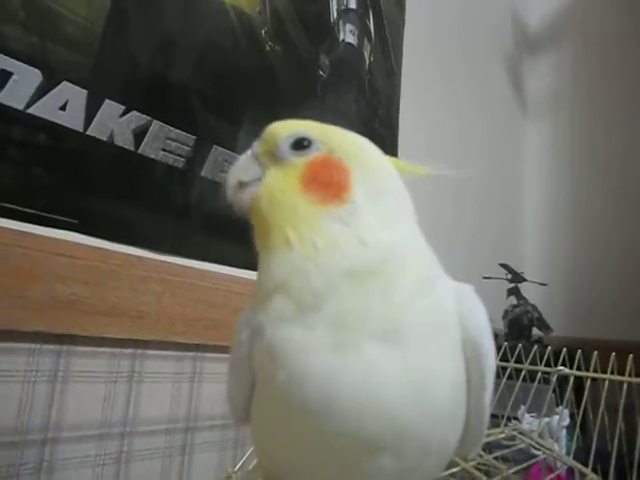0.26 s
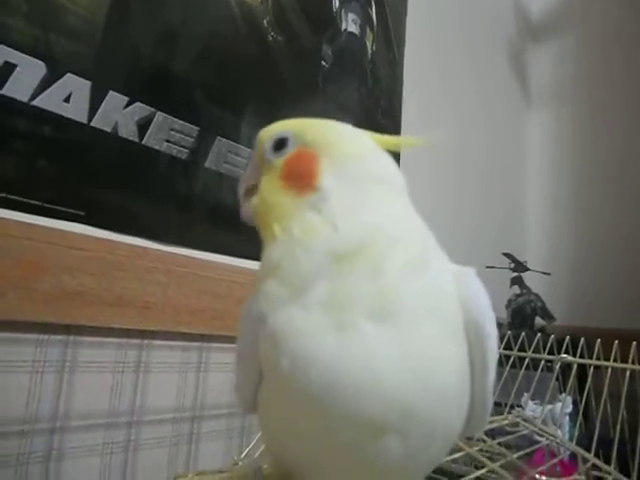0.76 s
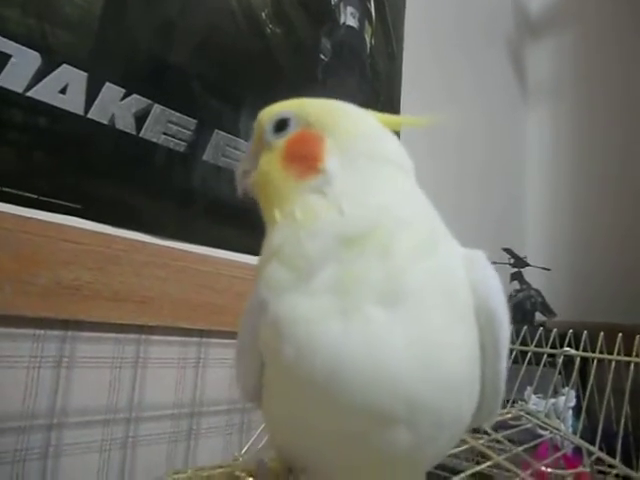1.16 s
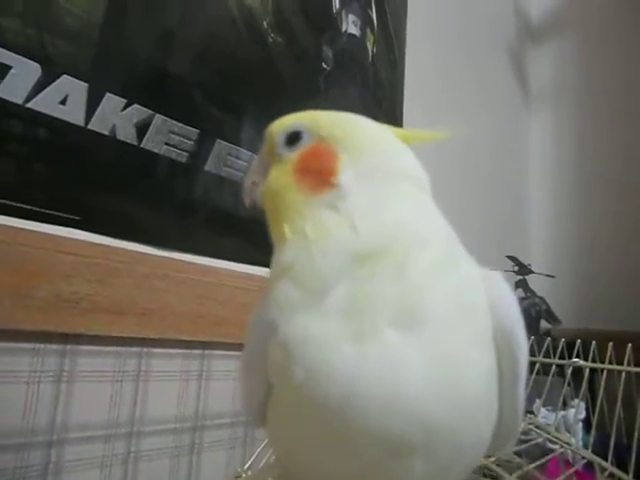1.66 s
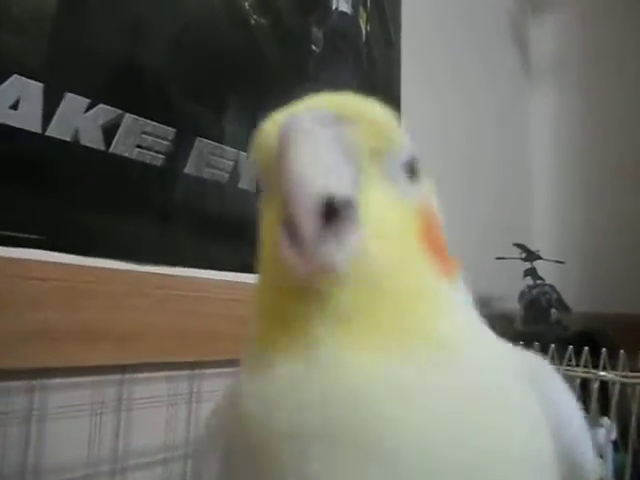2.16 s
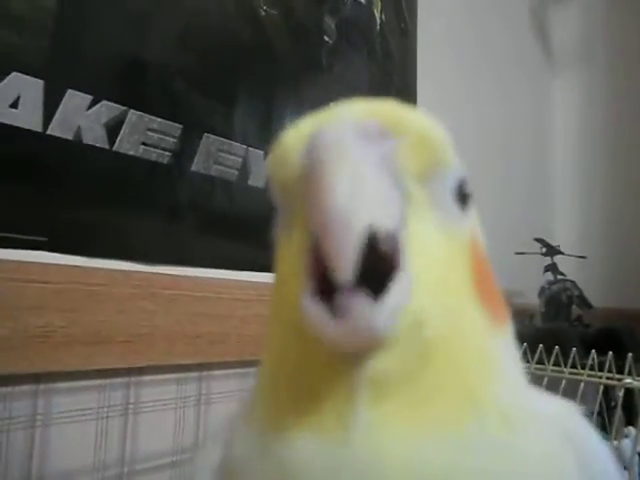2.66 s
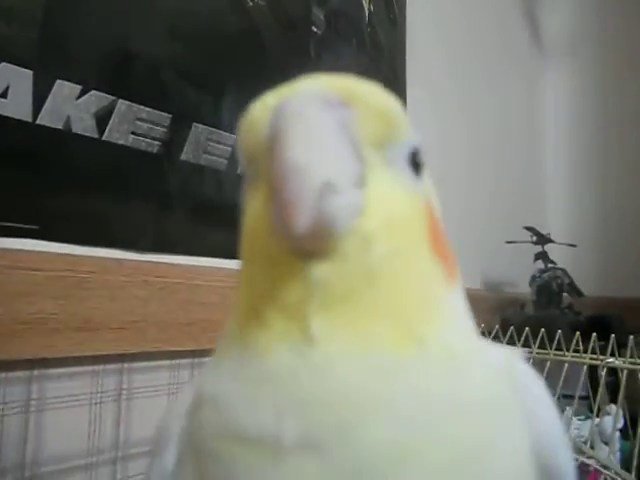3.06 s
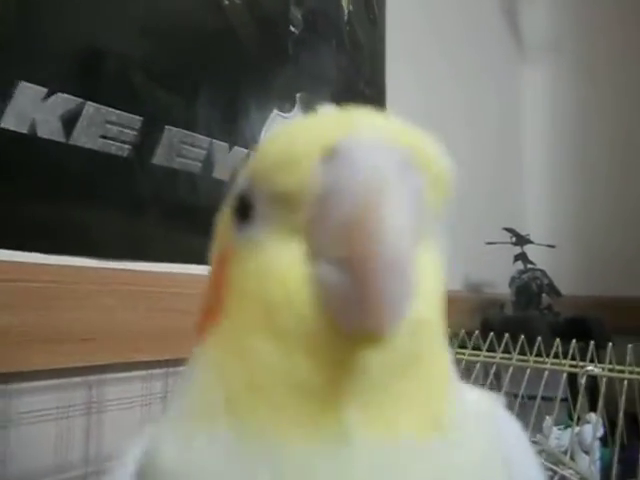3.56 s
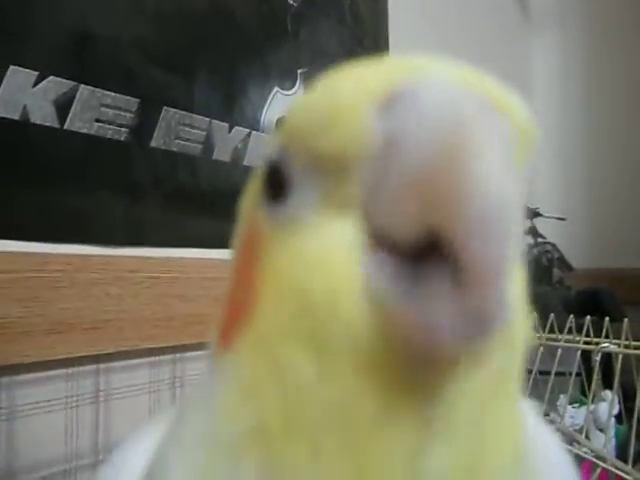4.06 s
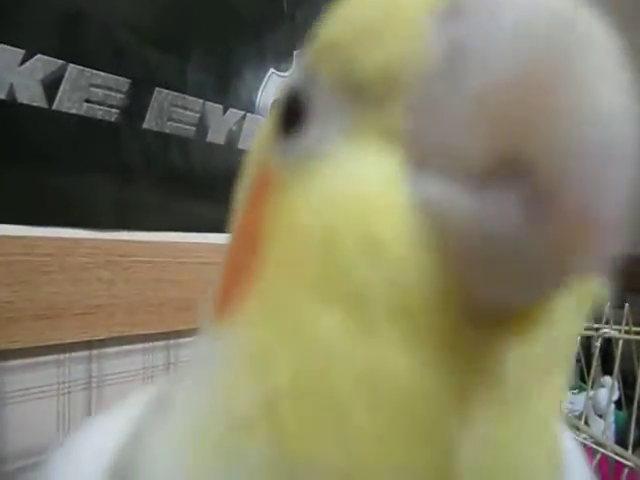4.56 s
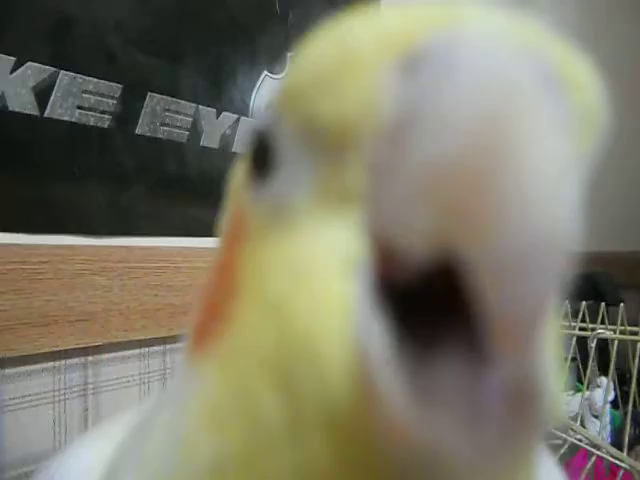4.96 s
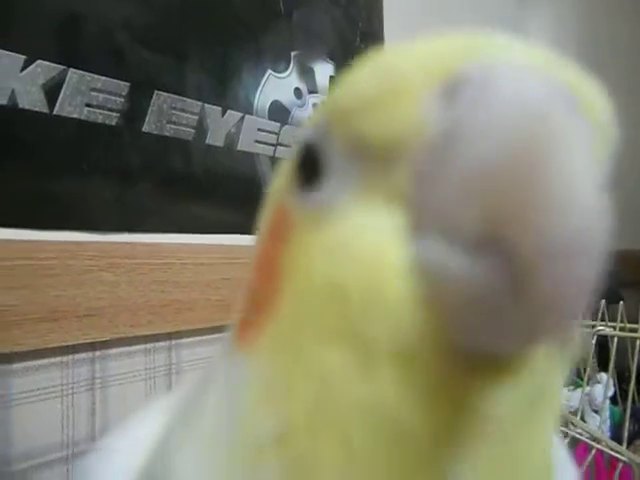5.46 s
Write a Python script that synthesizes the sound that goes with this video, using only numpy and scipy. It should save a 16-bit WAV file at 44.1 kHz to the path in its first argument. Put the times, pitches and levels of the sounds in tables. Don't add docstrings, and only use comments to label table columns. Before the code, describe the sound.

A small parrot calls close to the microphone in a small furnished room with little echo. From 0 to 0.8 s come four short, moderate, raspy croaks, each about a tenth of a second, swelling as the beak opens and closing with a small chirpy catch. Around 0.9 to 1.6 s three harsher, open-beaked rasps follow, then three swelling croaks that grow louder to 2.25 s, with a faint foot thump at 1.9 s. At 2.4 and 2.6 s two loud bursts yelp high and drop into a buzz, the second with a tiny squeak. A pause follows to 3.95 s, with faint beak ticks, a sharp click at 3.83 s, and hum and hiss creeping up. The loudest burst hits at 3.96 s, slightly clipped; more follow at 4.2, 4.4 (weaker) and 4.7 s, interleaved from 4.86 s by four lower, softer, rougher groans ending near 5.65 s.

```python
import sys
import numpy as np
from scipy import signal
from scipy.io import wavfile
from scipy.ndimage import uniform_filter1d

SR = 44100
rng = np.random.default_rng(int(sys.argv[2]) if len(sys.argv) > 2 else 0)


def gain_from_db(level_db):
    decades = np.asarray(level_db, float) / 20
    return 10 ** decades


def to_wav(s):
    ch = np.atleast_2d(s).T
    pcm = np.round(np.clip(ch, -1, 1) * 32767)
    wavfile.write(sys.argv[1], SR, pcm.astype(np.int16))


N = 252252


def evened(x):
    return x / np.sqrt(np.mean(x ** 2) + 1e-20)


def wander(hz):
    return evened(signal.sosfilt(signal.butter(2, hz, fs=SR, output="sos"), rng.standard_normal(N)))


def resonate(x, hz, width):
    turn = np.exp(2j * np.pi * np.cumsum(hz * np.ones(len(x))) / SR)
    r = np.exp(-np.pi * width / SR)
    return 2 * (turn * signal.lfilter([1 - r], [1, -r], x / turn)).real


def pulses(hz, rough):
    jitter = (.012 + 0.28 * rough ** 2) * wander(300) + .011 * wander(70)
    turns = np.cumsum(hz * np.exp(jitter)) / SR
    at = np.flatnonzero(np.diff(np.floor(turns)))
    late = (np.ceil(turns[at]) - turns[at]) / (turns[at + 1] - turns[at])
    flap_db = (0.55 + rough) * 2.9 * np.tanh(0.77 * wander(600))
    slow_db = 3.4 * np.tanh(0.61 * wander(130))
    strength = gain_from_db(flap_db + slow_db) / np.sqrt(hz / SR)
    strength *= np.where(wander(260) > 3.3 - 2.3 * rough, .2, 1)
    train = np.zeros(N + 16)
    for k in range(16):
        u = k - 7 - late
        np.add.at(train, at + k, strength[at] * np.sinc(u) * (1 + np.cos(np.pi * u / 8)) / 2)
    return train[7:N + 7]


def croaks(calls, width_hz, below_db, above_db, second_db):
    # mode_hz, mode_width_hz, level_db
    pipe_modes = [(680, 570, -8.5), (1426, 1416, 2)]
    s, beak_db, beak_hz, *columns = np.transpose(sum(calls, []))
    t = np.arange(N) / SR
    pipe_db, hz, rough = (np.interp(t, s, c) for c in columns)
    beak_hz = np.cbrt(np.interp(t, s, beak_hz ** 3))
    rough = np.clip(rough, 0, 1)
    sounding = np.zeros(N)
    for rows in calls:
        to_edge = np.minimum(t - rows[0][0] + 0.0014, rows[-1][0] + 0.0018 - t)
        sounding += np.clip(to_edge / 0.00062, 0, 1)
    breath = (.12 + .07 * rough) * rng.standard_normal(N)
    drive = sounding * (pulses(hz, rough) + breath)

    open_beak = gain_from_db(np.interp(t, s, beak_db)) * drive
    skirt = resonate(open_beak, beak_hz, width_hz)
    ring = resonate(skirt, beak_hz * 0.901, width_hz)
    ring = resonate(ring, beak_hz * 1.017, width_hz)
    low = ring - gain_from_db(below_db) * skirt
    for above in (1.3, 1.7):
        low = low - resonate(low, beak_hz * above, 1263)
    low = signal.sosfilt(signal.butter(5, (1200, 5000), "band", fs=SR, output="sos"), low)

    high = gain_from_db(second_db) * resonate(open_beak, beak_hz * 1.93, 800) - gain_from_db(above_db) * skirt
    high = high * (beak_hz / 4000) ** 4
    high = signal.sosfilt(signal.butter(4, (5300, 8300), "band", fs=SR, output="sos"), high)

    pipe_drive = gain_from_db(pipe_db) * drive
    pipe = np.zeros(N)
    for k, (mode_hz, mode_width_hz, db) in enumerate(pipe_modes):
        pipe += (-1) ** k * gain_from_db(db) * resonate(pipe_drive, mode_hz, mode_width_hz)
    pipe = signal.sosfilt(signal.butter(4, (400, 1800), "band", fs=SR, output="sos"), pipe)
    return gain_from_db(21.0) * (low + high) + gain_from_db(11.0) * pipe


def windpipe_db(effort_db):
    return -26 + 0.54 * effort_db


def row_at(rows, s):
    return [s] + [np.interp(s, rows[:, 0], c) for c in rows.T[1:]]


def with_chirp(rows, s, note_s, from_hz, to_hz, db):
    catch_s, rough, lift_db = .004, .1, .1
    end = s + note_s
    note = []
    for share, fade_db in ((0, 0), (.75, -3), (1, -10)):
        _, beak_db, beak_hz = row_at(rows, s + share * note_s)[:3]
        pitch_hz = from_hz + share * (to_hz - from_hz)
        note.append([s + share * note_s, beak_db + lift_db, beak_hz, db + fade_db, pitch_hz, rough])
    before = rows[rows[:, 0] < s - catch_s]
    after = rows[rows[:, 0] > end + catch_s]
    later = [row_at(rows, end + catch_s)] if rows[-1, 0] > end + catch_s else []
    return np.array([*before, row_at(rows, s - catch_s), *note, *later, *after])


def croak(start, length, early_db, late_db, rise, onset, hold, drop=()):
    # from_shut_s, beak_over_effort_db, beak_hz, windpipe_over_law_db, pulse_hz, roughness
    shutting = [
        (-.019, -1.1, 3254, 2.1, 719.8, .8),
        (-.009, -6, 2466, 6, 740, .75),
        (0, -17, 1850, 6.8, 742, .75),
        (.007, -46.5, 2342, 3, 740, .7),
    ]
    # start_s, length_s, from_hz, to_hz, windpipe_db
    clear_notes = [(0.121, .036, 1638, 1180, -35.5), (.362, 0.027, 1423, 1230, -33),
                   (.569, .011, 1526, 1450, -34.5), (.802, .024, 1243, 1150, -35.5),
                   (1.006, .014, 980.3, 1097, -24.5), (1.54, 0.015, 1228, 1214, -28),
                   (1.764, .008, 1102, 1167, -24.5), (1.796, .042, 1246, 1114, -29.5),
                   (1.992, .01, 1134, 1174, -24.5), (2.014, .011, 1245, 1250, -30),
                   (2.235, .008, 901, 990, -22.5), (2.72, 0.0096, 1357, 1347, -36),
                   (4.279, .017, 1150, 1330, -27.5), (4.53, .011, 1370, 1302, -28.5),
                   (4.762, .012, 1010, 1162, -28), (4.781, .013, 1320, 1220, -30.5),
                   (4.988, .02, 1492, 1146, -32.5), (5.186, 0.024, 1411, 1140, -32),
                   (5.412, 0.02, 1428, 1256, -31.5), (5.639, 0.012, 1460, 1182, -32)]
    sink_s = .033
    shut = start + length
    hold_hz = 719.8 - 18 * start
    wide_hz, sink_hz, arch_db, pipe_db, rough = hold

    rows = []
    for share, db, hz, pipe, *voice in onset:
        rows.append((start + rise * share, early_db + db, hz, windpipe_db(early_db) + pipe, *voice))
    held = rows[-1][0]
    span = shut - sink_s - held
    for share in (.35, .7):
        db = early_db + share * (late_db - early_db) + arch_db
        rows.append((held + share * span, db, wide_hz, windpipe_db(db) + pipe_db, hold_hz, rough))
    late_pipe_db = windpipe_db(late_db)
    rows.append((shut - sink_s, late_db, sink_hz, late_pipe_db + pipe_db, hold_hz * 1.04, rough))
    for s, db, hz, pipe, *voice in shutting:
        rows.append((shut + s, late_db + db, hz, late_pipe_db + pipe, *voice))
    rows = np.array(rows)

    if len(drop):
        s, *voice = np.transpose(drop)
        added = [row_at(rows, x) for x in s]
        rows = np.array(sorted([*map(list, rows), *added]))
        early = rows[:, 0] <= s[-1]
        rows[early, 4:] = np.transpose([np.interp(rows[early, 0], s, c) for c in voice])
    for note in clear_notes:
        if start < note[0] < shut + .03:
            rows = with_chirp(rows, *note)
    return list(map(tuple, rows))


def bouts():
    # start_s, until_shut_s, early_effort_db, late_effort_db, opening_s
    swells = [
        (.021, .096, -19, -27.5, .026),
        (.237, 0.11, -25.5, -30, .029),
        (.463, 0.1, -25, -24, .013),
        (.658, .13, -20.5, -23, .028),
        (1.642, 0.14, -19, -19, 0.029),
        (1.86, 0.15, -13.5, -13.5, .034),
        (2.124, .115, -12.5, -14.5, .016),
    ]
    groans = [
        (4.858, 0.12, -22.5, -24.5, .027),
        (5.073, 0.12, -22.5, -25.5, .029),
        (5.277, .133, -23.5, -22, .033),
        (5.499, 0.13, -20.5, -23, .039),
    ]
    # same columns, the last is full_effort_s
    rasps = [
        (.918, .107, -13, -26, 0.044),
        (1.214, .122, -12, -22, 0.041),
        (1.445, .117, -13.5, -21, .015),
    ]
    # same columns, the last is rise_s
    bursts = [
        (2.375, 0.12, -8, -21.5, 0.017),
        (2.612, 0.11, -8.5, -23, .016),
        (3.96, 0.1, -6, -20.5, .011),
        (4.18, .101, -11, -20, .01),
        (4.424, .102, -20, -23.5, 0.02),
        (4.691, .085, -10.5, -22.5, .004),
    ]
    # time_s, pulse_hz, roughness (0-1)
    drops = [
        [(2.374, 1355, 0.31), (2.39, 1316, .15), (2.404, 1025, 0.22), (2.418, 759.6, 0.32), (2.43, 676.6, 0.8),
         (2.47, 656.6, 0.94)],
        [(2.613, 1478, .4), (2.633, 1200, .3), (2.645, 880, .08), (2.662, 758.6, 0.1), (2.696, 680, .1),
         (2.706, 721, 0.74)],
        [(3.959, 1373, 0.46), (3.97, 1194, 0.36), (3.978, 919.5, 0.5), (4.008, 821, 0.7), (4.014, 811, 0.03),
         (4.04, 735, 0.55)],
        [(4.181, 1449, .6), (4.19, 1099, .35), (4.204, 777, 0.44), (4.23, 764.5, .48), (4.26, 688.7, 0.35)],
        [(4.422, 1438, 0.65), (4.436, 808, 0.61), (4.456, 754, 0.39), (4.47, 652, .59), (4.5, 700, 0.48)],
        [(4.691, 1310, .25), (4.704, 958, .4), (4.722, 834, 0.34), (4.748, 766, 0.21)],
    ]
    # share of the last column above, beak_over_effort_db, beak_hz, windpipe_over_law_db,
    # pulse_hz, roughness (0-1)
    swell_on = [
        (0, -34, 2400, -2.1, 1350, .3),
        (.3, -10, 2950, .6, 810.2, .45),
        (.6, -2.5, 3650, -1.5, 769.9, .45),
        (1.01, -0.5, 3850, -2, 740.2, .55),
    ]
    groan_on = [
        (0, -46, 2400, -1.5, 1369, 0.2203),
        (.3, -21, 2240, 1, 659.6, 0.43),
        (.6, -6.5, 3050, -1.5, 670, .4),
        (1.01, 0.5, 3780, -2, 650, .62),
    ]
    rasp_on = [
        (0, -17.5, 3857, 0.11, 775, .8),
        (.35, -2, 4015, -1.1, 731, .8),
        (1.01, 0, 4006, 0, 699, .9),
    ]
    burst_on = [
        (0, -5, 4258, 2, 1380, .25),
        (1.01, 0.5, 4053, -0.5, 1250, 0.17),
        (1.8, -5, 4005, -4, 900, .2),
    ]
    # widest beak_hz, beak_hz as it starts to shut, effort arch_db, windpipe_over_law_db, roughness
    swell_hold, groan_hold = (4000, 3800, 1.6, -.6, .88), (3950, 3620, -2, 0.5, 0.96)
    rasp_hold, burst_hold = (4002, 3851, -2, -.1, 0.8), (4050, 3750, -2, -2, .6)
    pause_s = 3.3
    calls = [croak(*row, swell_on, swell_hold) for row in swells]
    calls += [croak(*row, groan_on, groan_hold) for row in groans]
    calls += [croak(*row, rasp_on, rasp_hold) for row in rasps]
    calls += [croak(*row, burst_on, burst_hold, drop) for row, drop in zip(bursts, drops)]
    calls = sorted(calls)
    return [c for c in calls if c[0][0] < pause_s], [c for c in calls if c[0][0] > pause_s]


def head_shadow(voice):
    start_s, end_s = .88, 2.3
    aside = slice(round(start_s * SR), round(end_s * SR))
    voice[aside] -= .85 * resonate(voice[aside], 2770, 220)
    return voice


def squeaks():
    # start_s, length_s, from_hz, to_hz, level_db, octave_db
    whistles = [
        (2.61, 0.0081, 3310, 3230, -17, -38.5),
        (4.67, 0.013, 3110, 3210, -19.5, -44.5),
        (4.678, 0.014, 1913, 2259, -32.5, -11.5),
    ]
    out = np.zeros(N)
    for s, length, from_hz, to_hz, db, octave_db in whistles:
        phase = 2 * np.pi * np.cumsum(np.linspace(from_hz, to_hz, round(length * SR))) / SR
        tone = gain_from_db(db) * np.sin(phase) + gain_from_db(octave_db) * np.sin(2 * phase)
        tone += gain_from_db(octave_db - 25.5) * np.sin(3 * phase)
        out[round(s * SR):][:len(tone)] += np.sqrt(2) * tone * signal.windows.tukey(len(tone), .5)
    return out


def ticks():
    # start_s, peak_db, low_part_db
    clicks = [(2.1244, -27, -2), (2.2957, -31, -9), (2.3401, -28.5, 5), (2.5971, -41, 7),
              (3.1113, -46, -13.5), (3.5455, -25, -8.5), (3.8264, -12.5, -6), (3.9418, -24, -7),
              (4.3994, -31.5, 11), (4.4132, -32.5, 8), (4.6336, -29, -10), (4.8725, -49.5, -1),
              (5.0779, -46, -8), (5.5236, -29, 8)]
    out, t = np.zeros(N), np.arange(400) / SR
    for s, db, low_db in clicks:
        puff = rng.standard_normal(400) * np.exp(-t / .00025)
        snap = resonate(puff, 9300, 4500) + gain_from_db(low_db) * resonate(puff, 2200, 2500)
        out[round(s * SR):][:400] += gain_from_db(db) * snap / abs(snap).max()
    thump_s, thump_hz, thump_db = 1.905, 121.3, -28
    t = np.arange(2000) / SR
    thump = np.sin(2 * np.pi * thump_hz * t) * np.exp(-t / 0.0071)
    out[round(thump_s * SR):][:2000] += gain_from_db(thump_db) * thump
    return signal.sosfilt(signal.butter(12, 10000, fs=SR, output="sos"), out)


def walls(x, t60=0.14, dull_hz=6000):
    taps = np.zeros(SR // 2)
    at = np.arange(130, len(taps) - 22, 22)
    decay = gain_from_db(-60 * at / SR / t60)
    taps[at + rng.integers(0, 22, len(at))] = rng.choice([-1., 1.], len(at)) * decay
    taps = signal.lfilter(*signal.butter(1, dull_hz, fs=SR), taps)
    return signal.oaconvolve(x, taps / np.linalg.norm(taps))[:N]


def room_tone():
    # time_s, level_db
    gain_curve = [(0, -51), (.29, -50.5), (.45, -46.5), (.92, -42), (1.22, -43.5), (1.27, -45.5),
                  (1.9, -45.5), (2.38, -47.5), (2.40, -52.5), (2.62, -53), (2.64, -56), (3.28, -57.5),
                  (3.45, -50), (3.9, -43.5), (3.96, -45.5), (3.98, -51), (4.2, -56), (5.72, -55.5)]
    # multiple of the mains, level_db under the main line
    hum_lines = [(1, -9), (2, -11), (3, -0.5), (4, -15.5), (5, -20), (6, -14.5), (7, -18), (9, -14),
                 (10, -13), (11, -12.5), (13, -8.5), (14, -15), (15, -8.5), (17, -16)]
    # frequency_hz, density_db per Hz
    air_spectrum = [(15, -47), (25, -6), (129, -13.5), (176, -9), (288, -14.5), (716, -8.5), (774, -12.5),
                    (836, -12), (904, -13.5), (1030, -11.5), (3680, -20.5), (7830, -23), (10200, -24.5),
                    (12500, -58), (16200, -66), (22000, -120)]
    mains_hz, air_db = 60, -1
    t, frames, hz = np.arange(N) / SR, N // 512 + 5, np.fft.rfftfreq(2048, 1 / SR)
    hum = np.zeros(N)
    for k, db in hum_lines:
        hum += gain_from_db(db) * np.sin(2 * np.pi * (k * mains_hz * t + rng.random()))
    a, b, patches = rng.standard_normal((frames, len(hz), 3)).T
    patches = uniform_filter1d(patches, 20, 0)
    patches = evened(uniform_filter1d(patches, 6, 1))
    f, db = np.transpose(air_spectrum)
    colour_db = np.interp(np.log(hz + 1), np.log(f), db)
    spectrum = (a + 1j * b) * gain_from_db(colour_db[:, None] + .7 * patches)
    air = signal.istft(spectrum, nperseg=2048, noverlap=1536)[1][:N]
    gain = gain_from_db(np.interp(t, *np.transpose(gain_curve)))
    return gain * (np.sqrt(2) * hum + gain_from_db(air_db) * evened(air))


def scene():
    first, second = bouts()
    voice = croaks(first, width_hz=560, below_db=-13, above_db=-38.5, second_db=-39)
    voice = voice + croaks(second, width_hz=780, below_db=-15, above_db=-35.5, second_db=-37.5)
    bird = head_shadow(voice) + squeaks() + ticks()
    return (bird + gain_from_db(-25.5) * walls(bird) + room_tone())[None]


def band_limit(x):
    return signal.sosfilt(signal.butter(12, 15960, fs=SR, output="sos"), x)


def record(dry):
    clip = .735
    dull = signal.sosfilt(signal.butter(10, 12200, fs=SR, output="sos"), dry)
    return band_limit(np.clip(dull, -clip, clip))


dry = scene()
out = record(dry)
to_wav(out)
```